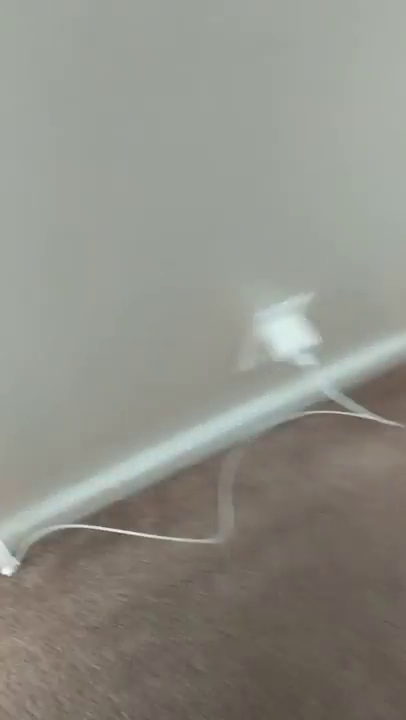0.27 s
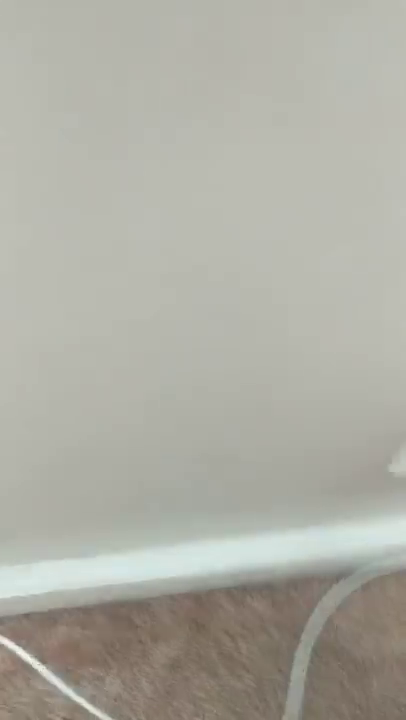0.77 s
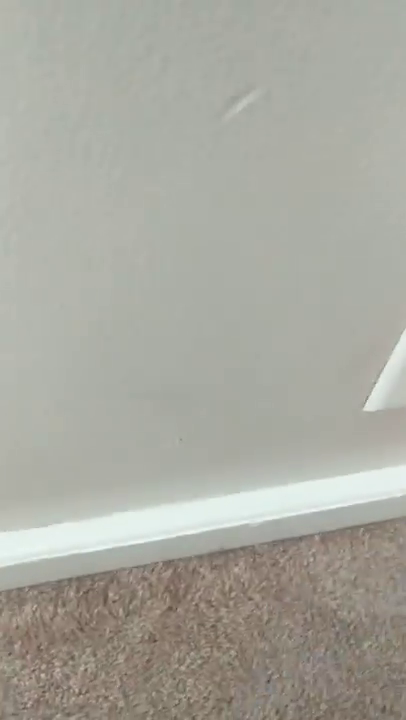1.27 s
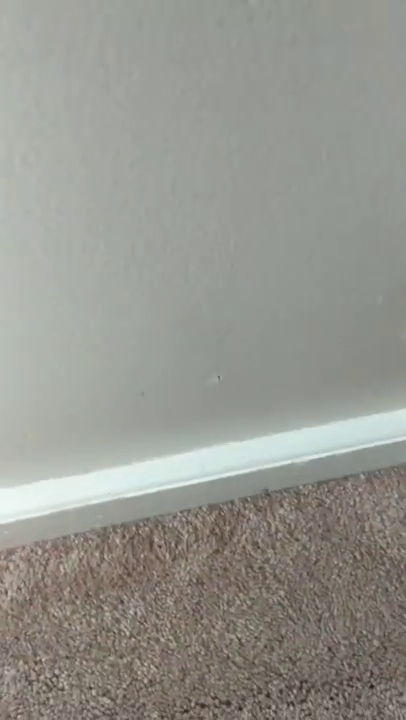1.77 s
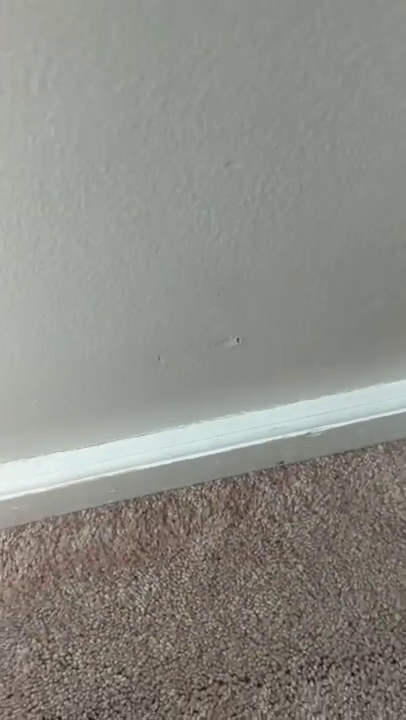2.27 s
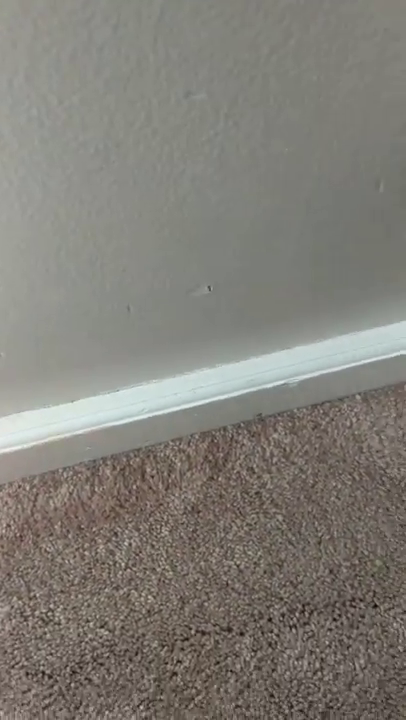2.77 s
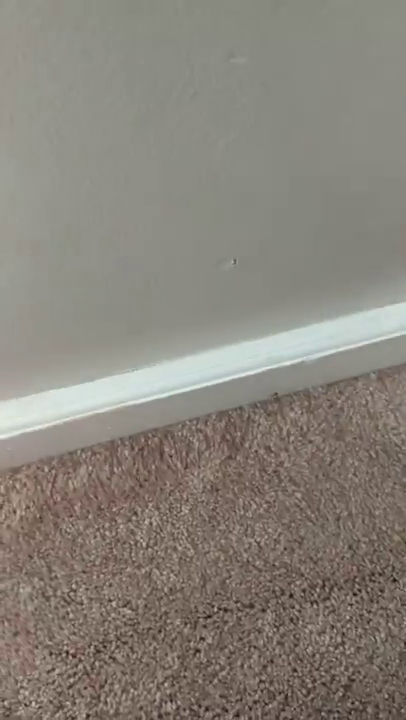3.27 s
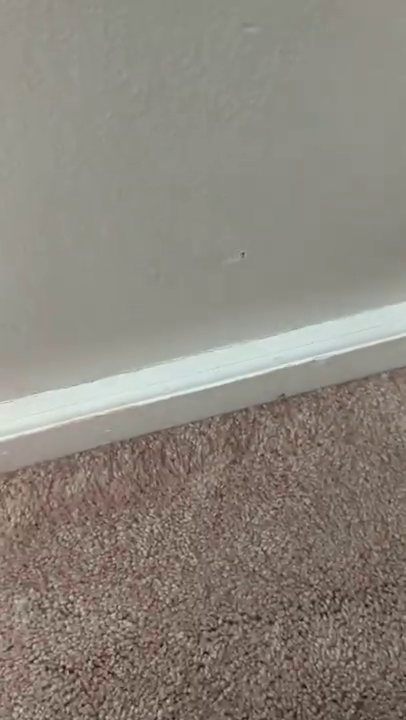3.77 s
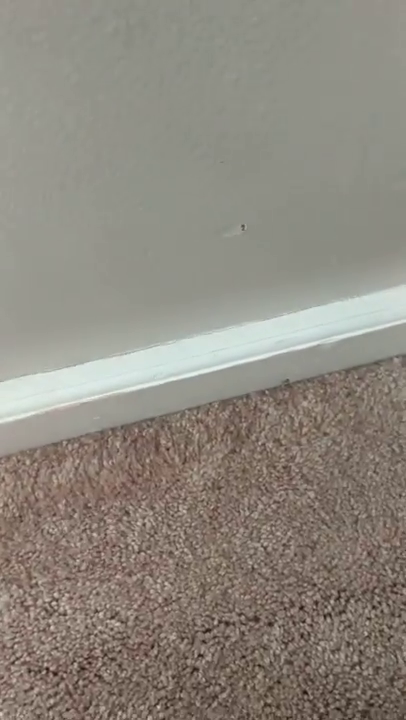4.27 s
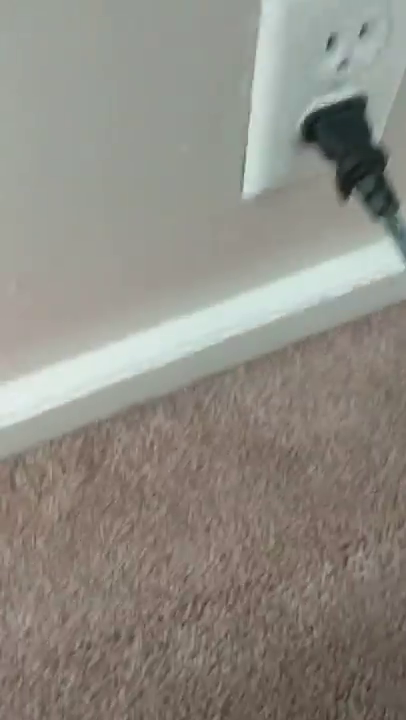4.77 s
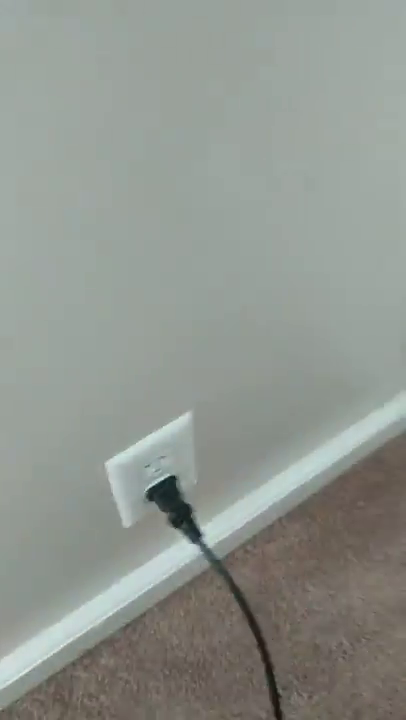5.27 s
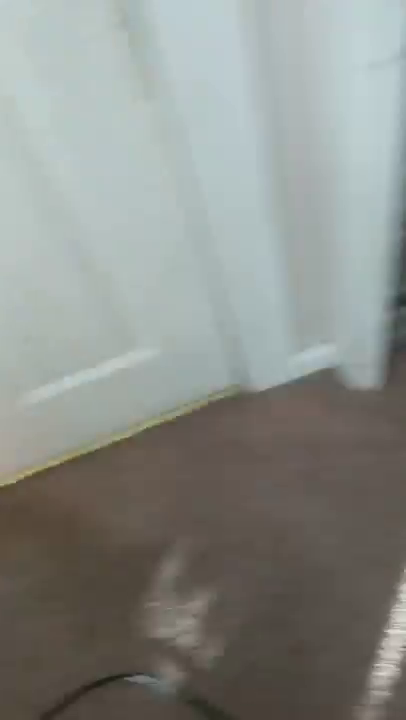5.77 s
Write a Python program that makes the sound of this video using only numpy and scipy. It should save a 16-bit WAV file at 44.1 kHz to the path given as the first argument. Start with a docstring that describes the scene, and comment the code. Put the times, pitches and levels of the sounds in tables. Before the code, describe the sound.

A steady low appliance motor drone throbs in a carpeted room while grit clicks sharply on plastic nearby, ending in a few soft thumps.

```python
"""An appliance motor drones in a carpeted living room, over a boomy rush of air.
Its rotor lags the mains, so two hums a few hertz apart beat about five times a second.
Close by, grit clicks sharply on plastic: noisy contacts drive resonant filters.
Short scuffs and squeaks are bursts of band-limited noise; a soft rustle is crackly, shifting hiss.
Dull thumps through the floor are brief low tones, most of them at the end, over a rumble."""
import sys
import numpy as np
from scipy import signal
from scipy.fft import rfft, irfft, next_fast_len
from scipy.io import wavfile
from scipy.ndimage import uniform_filter1d

SR = 44100
rng = np.random.default_rng(int(sys.argv[2]) if len(sys.argv) > 2 else 0)


def master(y):
    """Save y as 16-bit WAV."""
    cut = np.clip(np.atleast_2d(y).T, -1, 1)
    pcm = np.round(cut * 32767)  # scale
    wavfile.write(sys.argv[1], SR, pcm.astype(np.int16))


N = 264776
TIME = np.arange(N) / SR


def gain_of(db):
    """Decibels to amplitude."""
    return 10 ** (np.asarray(db) / 20)


def evened(x):
    """Scales to rms 1."""
    return x / np.sqrt(np.mean(x ** 2) + 1e-20)


def read_gain(points, hz):
    """A dB spectrum, joined by straight lines over log frequency, as amplitudes."""
    point_hz, level_db = np.transpose(points)
    return gain_of(np.interp(np.log(hz + 1), np.log(point_hz + 1), level_db))


def curve(rows):
    """A breakpoint curve read at every sample."""
    return np.interp(TIME, *np.transpose(rows))


def add(mix, start_s, sound):
    """Mixes a sound in at its start time, cut off at the end of the mix."""
    part = mix[max(round(start_s * SR), 0):][:len(sound)]
    part += sound[:len(part)]


def noise(shape, size=N):
    """Noise of rms 1 whose amplitude spectrum follows shape(Hz)."""
    padded = next_fast_len(size)
    spectrum = rfft(rng.standard_normal(padded)) * shape(np.fft.rfftfreq(padded, 1 / SR))
    return evened(irfft(spectrum, padded)[:size])


def drift(hz, size=N):
    """A random wander of rms 1, mostly slower than hz."""
    return noise(lambda f: (f > 0) / (1 + (f / hz) ** 4), size)


def snags(size, snags_per_s=260):
    """Sparse, tiny catches of uneven size, rms 1."""
    caught = rng.random(size) < snags_per_s / SR
    return evened(rng.standard_normal(size) * caught)


def causal(gain):
    """The tightest (minimum-phase) impulse response with this amplitude spectrum."""
    mirrored = np.r_[gain, gain[-2:0:-1]]
    log_gain = np.log(np.maximum(mirrored, 1e-7))
    return np.fft.ifft(np.exp(np.conj(signal.hilbert(log_gain)))).real


def hump(hz, centre_hz, octaves):
    """A bell over log frequency, 1 at its centre."""
    return np.exp(-(np.log2((hz + 1) / centre_hz) / octaves) ** 2)


def peaks_db(modes, hz):
    """The lift in dB that a set of resonances gives."""
    return sum(db / (1 + (2 * (hz - f) / width) ** 2) for f, width, db in modes)


def air(rush_db=-44, whistle_db=-90, half_whistle_db=-90, waver_turns=0.41):
    """Turbulence coloured by resonances, with a very faint, unsteady whistle and its lower octave."""
    # spectrum of the moving air: pitch_hz [Hz], relative level_db [dB per Hz]
    air_spectrum = [(22, -28), (36, -14), (48, 4), (62, -6.5), (76, 9.5), (94, 10), (112, -0.5), (148, 0),
                    (205, -7), (390, -12), (700, -22.5), (1500, -34), (4000, -46), (8000, -55.5),
                    (16000, -52)]
    # level of the moving air over time: time_s [s], gain_db [dB]
    air_level = [(0, -1.5), (5.5, -2), (6, -6.5)]
    # resonances of the housing in the air flow: pitch_hz [Hz], width_hz [Hz], lift_db [dB]
    duct = [(397, 38, 3), (546, 31, 3.5), (878, 230, 4), (1288, 6.2, 11)]
    # wandering pitch of the whistle: time_s [s], pitch_hz [Hz]
    whistle_pitch = [(2.3, 10300), (2.6, 10700), (3.05, 10950), (3.45, 10600), (4.5, 10640)]
    rush = gain_of(rush_db) * noise(lambda f: read_gain(air_spectrum, f) * gain_of(peaks_db(duct, f)))
    turns = np.cumsum(curve(whistle_pitch)) / SR + waver_turns * drift(6.3)
    whistle = gain_of(whistle_db) * np.cos(2 * np.pi * turns)
    lower_octave = gain_of(half_whistle_db) * np.cos(np.pi * turns)
    return gain_of(curve(air_level)) * (rush + whistle + lower_octave)


def motor(mains_hz=59.985, rotor_hz=57.305, in_step_s=3.09, waver_s=.00008,
          fan_hz=355, fan_waver_turns=0.35, fan_db=-60.5):
    """Twice the mains and twice the rotor speed beat together; the fan adds a wavering note."""
    # hum of the iron: multiple of the mains frequency, level_db [dB rms before nearness]
    mains_orders = [(2, -37.5), (4, -58), (6, -63.5), (8, -74.5)]
    # hum of the turning rotor: multiple of the rotor speed, level_db [dB rms before nearness]
    rotor_orders = [(1, -47.5), (2, -47), (4, -89.5)]
    # the machine comes nearer, stays, and draws away: time_s [s], gain_db [dB]
    nearness = [(0, -6.5), (.6, -1), (2.7, -0.5), (4.8, -0.16), (5.3, -2.5), (6, -6.5)]
    clock = TIME - in_step_s + waver_s * drift(4.4)  # near its zero all the hums crest together
    hum = np.zeros(N)
    for base_hz, orders in ((mains_hz, mains_orders), (rotor_hz, rotor_orders)):
        for multiple, level_db in orders:
            hum += gain_of(level_db) * np.cos(2 * np.pi * multiple * base_hz * clock)
    fan_turns = fan_hz * TIME + fan_waver_turns * drift(2.84)
    fan = gain_of(fan_db) * np.cos(2 * np.pi * fan_turns)
    near = gain_of(curve(nearness))
    # the higher note fades faster with distance; root 2 makes the levels rms
    return np.sqrt(2) * near * (hum + near * fan)


def thumps(rumble_db=-40, rumble_hz=140, low_cut_hz=36):
    """Soft blows of a few low cycles, longer when deeper; jostling adds a lumpy rumble at the end."""
    # thumps through the floor: crest_s [s], level_db [dB peak before the low cut], pitch_hz [Hz]
    thump_table = [(0.178, -33.5, 48), (0.511, -29.5, 76), (.702, -29.5, 192), (1.496, -23, 109),
                   (2.4961, -24, 161), (4.345, -25.5, 131), (5.706, -36, 154), (5.745, -19.5, 105),
                   (5.812, -34, 247), (5.862, -31, 145), (5.876, -20.5, 66), (5.909, -43, 264),
                   (5.942, -25.5, 62.3), (5.948, -29.5, 165), (5.99, -29, 101)]
    blows = np.zeros(N)
    for crest_s, level_db, pitch_hz in thump_table:
        # 14 ms at 96.4 Hz, and never under 4.7 ms
        length_s = max(0.014 * (96.4 / pitch_hz) ** 2.4, 0.0047)
        since_crest = TIME - crest_s
        swell = np.exp(-(2 * since_crest / length_s) ** 2)
        blows += gain_of(level_db) * swell * np.cos(2 * np.pi * pitch_hz * since_crest)
    low_cut = signal.butter(2, low_cut_hz, "high", fs=SR, output="sos")
    blows = signal.sosfiltfilt(low_cut, blows)
    rumble = noise(lambda f: f ** 4 / (f ** 4 + 45 ** 4) / (1 + (f / rumble_hz) ** 3))
    fade_in = np.interp(TIME, [5.65, 5.85], [0, 1])
    return blows + gain_of(rumble_db) * fade_in * rumble


def rustle(lift_db=7, grain_db=1.5, crackle_db=-11, shift_db=2.5, split_hz=3500):
    """Fibres brush past each other and catch: a crackly hiss whose dull part swells on its own."""
    # spectrum of the rustle: pitch_hz [Hz], relative level_db [dB per Hz]
    rustle_spectrum = [(200, -9.5), (700, 8.5), (1600, 4), (3000, -0.5), (5000, -4), (8000, -7),
                       (14000, -7.5), (16000, -12)]
    # briskness of the movement: time_s [s], level_db [dB before lift_db]
    briskness = [(0, -70), (.11, -73), (.2, -71.5), (.7, -68), (1, -80.5), (1.22, -79.5), (1.38, -70),
                 (1.55, -75), (2.2, -85.5), (2.5, -81.5), (3.4, -87), (4.22, -84), (4.7, -78), (4.87, -77),
                 (5.28, -71.5), (5.47, -79), (5.76, -68.5), (6, -76.5)]
    hz = np.fft.rfftfreq(N, 1 / SR)
    brushing = rng.standard_normal(N) + gain_of(crackle_db) * snags(N)
    hiss = evened(irfft(rfft(brushing) * read_gain(rustle_spectrum, hz), N))
    dull = irfft(rfft(hiss) / (1 + (hz / split_hz) ** 4), N)
    bright = hiss - dull
    shifting = dull * gain_of(shift_db * drift(9)) + bright
    grain = gain_of(lift_db + grain_db * drift(150))
    return grain * gain_of(curve(briskness)) * shifting


def rub(middle_s, length_s, level_db, pitch_hz, width_hz, grain_db=3, snag_db=-9, size=16384):
    """Uneven slips and tiny snags in one resonance, swelling and fading; gives start and sound."""
    f = np.fft.rfftfreq(size, 1 / SR)
    slips = rng.standard_normal(size) * gain_of(grain_db * drift(262, size))
    slips = slips + gain_of(snag_db) * snags(size)
    resonance = f / (f + 500) / (1 + ((f - pitch_hz) / width_hz * 1.8) ** 2)
    band = irfft(rfft(slips) * resonance)[:int(length_s * SR)]
    return middle_s - length_s / 2, gain_of(level_db) * evened(band) * np.hanning(len(band))


def scuffs(scuff_width_share=1.6, squeak_width_hz=510):
    """Loose rubs scuff over a band that widens with its pitch; tight ones squeak in a narrow one."""
    # broad scuffs and light taps: middle_s [s], length_s [s], level_db [dB rms before fading], centre_hz [Hz]
    scuff_table = [(0.05, 0.0038, -64, 2500), (0.202, 0.14, -65.5, 5000), (0.47, 0.29, -65, 1890),
                   (.453, .008, -56, 2900), (0.672, 0.16, -64.5, 4000), (.725, .006, -57, 3500),
                   (.755, 0.0036, -58, 3400), (0.809, 0.048, -53.5, 6060), (1.135, .025, -68, 9000),
                   (1.189, 0.011, -64, 7000), (1.324, 0.0064, -56.5, 2500), (1.367, 0.0089, -52.5, 3300),
                   (1.392, .006, -57, 1700), (1.399, 0.044, -61, 3000), (1.449, 0.017, -55.5, 2900),
                   (1.729, 0.0084, -58.5, 2700), (1.49, 0.019, -60.5, 4950), (2.062, 0.044, -67, 1490),
                   (2.109, 0.046, -60, 1780), (2.181, 0.016, -48, 1800), (2.226, 0.039, -56.5, 1490),
                   (2.219, 0.022, -60.5, 3300), (2.475, 0.12, -69, 9500), (2.487, 0.14, -60.5, 1700),
                   (2.78, 0.087, -74, 8000), (2.842, 0.0042, -59.5, 2180), (3.159, 0.13, -64, 8750),
                   (3.181, 0.028, -51.5, 1360), (4.128, 0.078, -61.5, 6000), (4.144, .1, -61, 1490),
                   (4.335, 0.094, -68, 9100), (4.377, 0.27, -67, 2140), (4.807, 0.005, -57.5, 2160),
                   (4.867, 0.17, -71, 10000), (5.322, 0.21, -65.5, 3140), (5.807, 0.015, -50.5, 1500)]
    # squeaky rubs: middle_s [s], length_s [s], level_db [dB rms before fading], pitch_hz [Hz]
    squeak_table = [(0.409, .11, -72, 5130), (2.22, 0.02, -60.5, 11400), (0.504, 0.013, -53.5, 3170),
                    (0.921, 0.05, -68.5, 4970), (0.926, 0.12, -62, 1560), (1.112, 0.014, -64.5, 3400),
                    (1.271, 0.0066, -39, 14460), (3.159, 0.014, -64, 9000), (3.815, 0.094, -70, 3600),
                    (4.005, 0.048, -67.5, 3360), (4.132, 0.066, -57, 4900), (4.125, 0.046, -60, 3650),
                    (4.392, 0.07, -71, 4550), (4.427, 0.045, -68.5, 4750), (4.743, 0.011, -58.5, 4370),
                    (5.108, 0.019, -60, 14300), (5.353, 0.13, -69, 6600)]
    out = np.zeros(N)
    for middle_s, length_s, level_db, centre_hz in scuff_table:
        add(out, *rub(middle_s, length_s, level_db, centre_hz, scuff_width_share * centre_hz))
    for middle_s, length_s, level_db, pitch_hz in squeak_table:
        add(out, *rub(middle_s, length_s, level_db, pitch_hz, squeak_width_hz))
    return out


def contact(crunch_ms, blow=0.3, rise_ms=0.25, grain_db=6, body_db=-13, body_ms=7, body_hz=950, size=2048):
    """One blow, a quick run of uneven smaller contacts, and a dull shudder that outlasts them."""
    ms = np.arange(size) * 1000 / SR
    crunch = rng.standard_normal(size) * gain_of(grain_db * drift(2100, size))
    crunch *= (1 - np.exp(-ms / rise_ms)) * np.exp(-(ms / crunch_ms) ** 0.95)
    crunch /= np.linalg.norm(crunch)
    body = noise(lambda f: 1 / (1 + (f / body_hz) ** 2), size) * np.exp(-ms / body_ms)
    body /= np.linalg.norm(body)
    return blow * (ms == 0) + crunch + gain_of(body_db) * body


def grit(pivot_hz=2500, knock_hz=548, knock_octaves=0.79, ring_octaves=0.3, ring_width_hz=86,
         ring_share=0.33, ripple_db=1.06, ripple_ms=2.3, low_hz=220, size=2048, smooth_bins=25):
    """Each grain rings the plastic shell, most of all two resonances of the spot that it strikes."""
    # grit: start_s [s], strength_db [dB], brightness [dB per octave], crunch_ms [ms], hollow knock_db [dB],
    # low_ring_hz [Hz], low_lift_db [dB], high_ring_hz [Hz], high_lift_db [dB]
    clicks = [(.605, -24.5, 1, 3.5, 11, 1360, 13, 4240, 11.5),
              (.609, -20.5, -2, 1.4, -3, 910, 14.5, 3050, 8),
              (0.6961, -15.5, -6, 3.6, 0, 1000, 3, 1850, 8.5), (0.7802, -27, -3, 3.8, 8, 2060, 5, 4520, 7),
              (0.7911, -15, -4, 3.5, -3, 810, 5, 10510, 6),
              (.794, -15.5, -4, 2.3, -0.5, 1880, 8.5, 7600, 14.5),
              (0.8174, -26.5, -5, 5, 9.5, 895, 5.5, 13000, 13),
              (1.2682, -10.5, -3.5, 1.5, -19, 2200, 5.5, 5500, 9),
              (1.3713, -20, -6.5, 1.5, -5, 1550, 7.5, 2240, 9),
              (1.6911, -21, -5.5, 0.92, -30, 2200, 8, 5600, 10.5),
              (2.0271, -16.5, -7.5, 3.1, -7, 1440, 3.5, 2900, 10.5),
              (2.1752, -10, -5, 1.1, -18, 2400, 5, 4270, 14),
              (2.328, -26, -2.5, 2, 12, 5550, 19, 11000, 13), (2.3435, -23, -5, 4, -2, 1430, 4, 8400, 12.5),
              (2.422, -27, -1.5, 1.6, 1, 830, 9, 5050, 12.5),
              (2.492, -11, -7, 2.7, -13.5, 461, 13.5, 2780, 5.5),
              (2.513, -35, -8, 1.3, -10, 2730, 8, 4500, 14), (3.075, -26.5, -4, 2.2, -2, 960, 3, 8200, 4),
              (3.094, -30.5, -3, 4.9, 3, 2950, 4, 6730, 6),
              (3.1824, -26.5, -3, 4.9, 6.5, 1110, 6, 3400, 6.5),
              (3.189, -24.5, 0.5, 4.5, 11, 1020, 10.5, 10700, 7),
              (3.207, -31, -0.5, 3.4, 19, 970, 8, 6150, 13.5),
              (3.641, -19.5, -1.5, 2.5, 14, 660, 6, 2940, 6.5),
              (4.1083, -15.5, -6, 2.8, -2, 3660, 12, 4970, 9.5),
              (4.1308, -25.5, -1.5, 1.3, 11, 1080, 10, 3590, 17),
              (4.1589, -23.5, -1.5, 3, 5, 1280, -2, 3770, 0),
              (4.1689, -22, -6, 4.7, -10, 1320, 4.5, 9200, 13), (4.337, -9, -6, 1.5, -4, 510, 5, 2580, 9.5),
              (4.3426, -27.5, -9, 0.95, -0.5, 690, 8, 2370, 10),
              (5.8024, -23, -7, 1.5, -0.5, 1770, 4.5, 3280, 7.5)]
    # resonances of the plastic they strike: pitch_hz [Hz], width_hz [Hz], lift_db [dB]
    shell = [(1310, 420, 5), (2500, 620, 7), (3480, 320, 6.5), (5240, 640, 6)]
    out = np.zeros(N)
    hz = np.fft.rfftfreq(size, 1 / SR)
    ms = np.arange(size) * 1000 / SR
    for start_s, strength_db, brightness, crunch_ms, knock_db, low_hz_ring, low_db, high_hz_ring, high_db in clicks:
        drive = contact(crunch_ms)
        drive_gain = np.sqrt(uniform_filter1d(abs(rfft(drive)) ** 2, smooth_bins))
        colour_db = strength_db + brightness * np.log2((hz + 1) / pivot_hz) + peaks_db(shell, hz)
        colour_db += knock_db * hump(hz, knock_hz, knock_octaves)  # hollow note of the whole shell
        for ring_hz, lift_db in ((low_hz_ring, low_db), (high_hz_ring, high_db)):
            colour_db += lift_db * hump(hz, ring_hz, ring_octaves)
            # a sharp tip on the broad hump rings on briefly
            colour_db += ring_share * peaks_db([(ring_hz, ring_width_hz, lift_db)], hz)
        # random fine ripple over frequency
        ripple = rfft(rng.standard_normal(size) * (ms < ripple_ms) * ms).real
        colour_db += ripple_db * evened(ripple)
        low_cut = hz ** 3 / (hz ** 3 + low_hz ** 3)
        # dividing by the drive's broad spectrum lets the shell alone set the colour
        ring = causal(gain_of(colour_db) / drive_gain * low_cut)
        add(out, start_s, signal.fftconvolve(drive, ring))
    return out


def room(x, t60_s=0.18, dull_hz=3200, size=16384):
    """Walls and carpet return a short, dull tail, a decaying noise that starts 4 ms late."""
    t = np.arange(size) / SR
    tail = noise(lambda f: 1 / (1 + (f / dull_hz) ** 2), size)
    tail = tail * gain_of(-60 * t / t60_s) * (t > .004)
    return signal.fftconvolve(x, tail / np.linalg.norm(tail))[:N]


def scene(room_db=-24):
    """Drone, air, thumps and rustle, with clicks and scuffs close and nearly dry in front."""
    background = air() + motor() + thumps() + rustle()
    close = scuffs() + grit()
    return (background + close + gain_of(room_db) * room(close))[None]


def record(dry, edge_hz=16200):
    """A steep low-pass removes the treble above the edge."""
    low_pass = signal.firwin(511, edge_hz, window=("kaiser", 9), fs=SR)
    return signal.oaconvolve(dry, low_pass[None], "same")


dry = scene()
out = record(dry)
master(out)
```